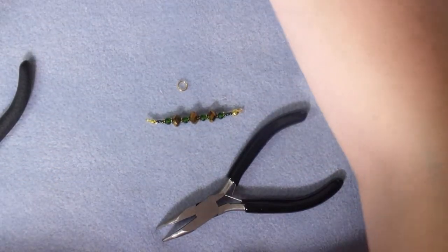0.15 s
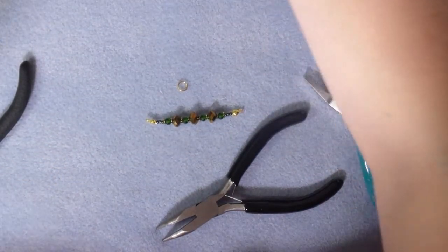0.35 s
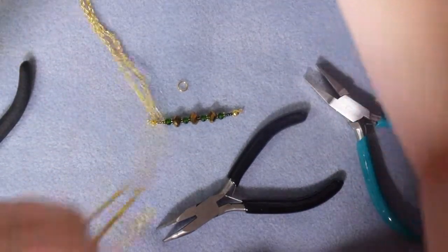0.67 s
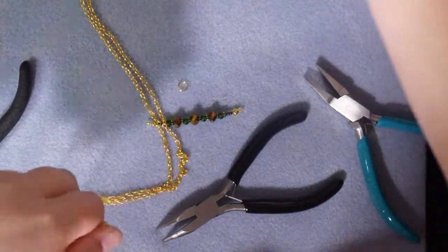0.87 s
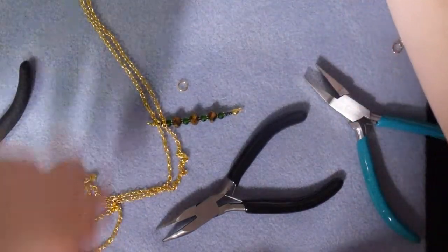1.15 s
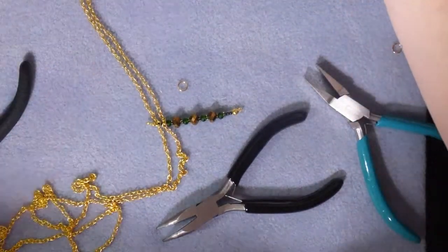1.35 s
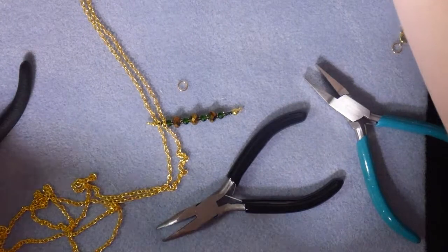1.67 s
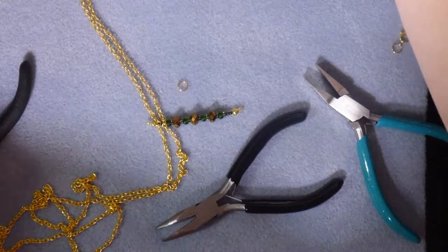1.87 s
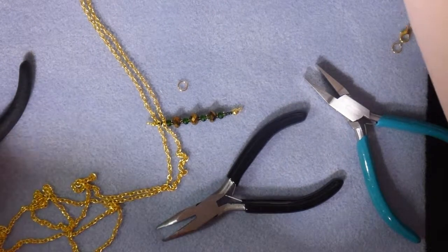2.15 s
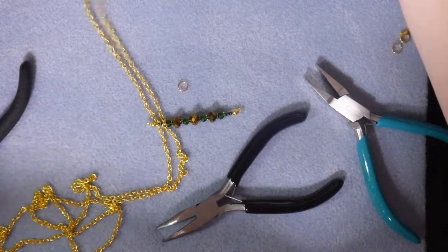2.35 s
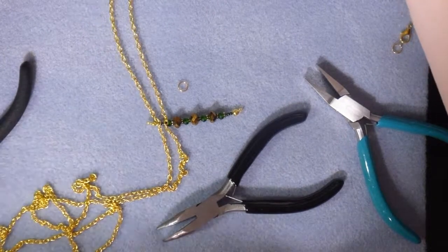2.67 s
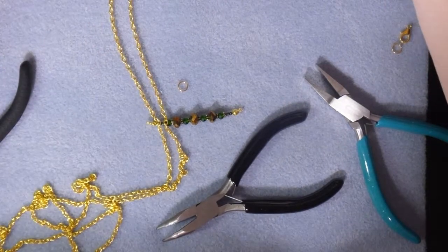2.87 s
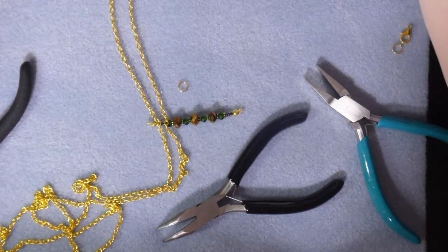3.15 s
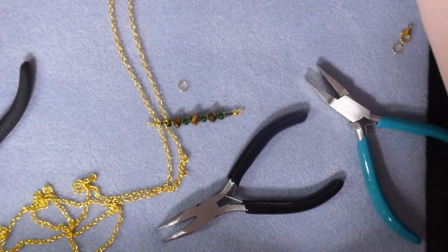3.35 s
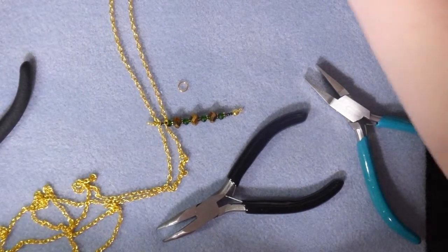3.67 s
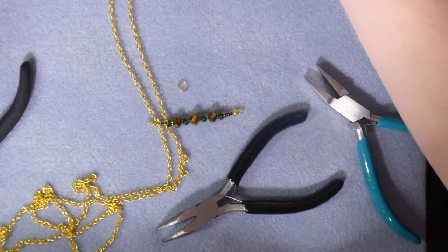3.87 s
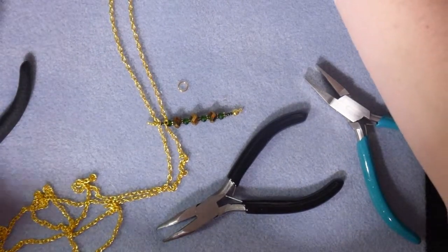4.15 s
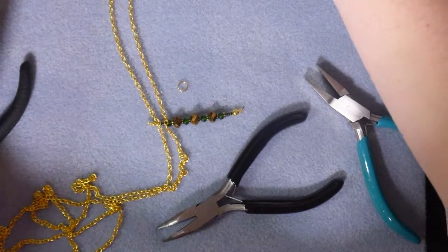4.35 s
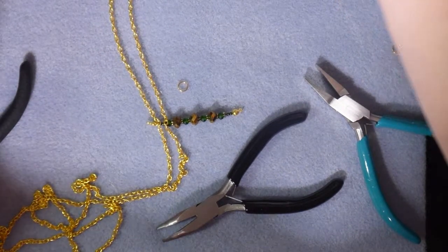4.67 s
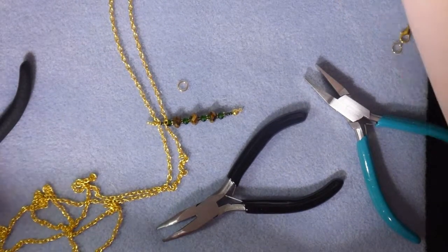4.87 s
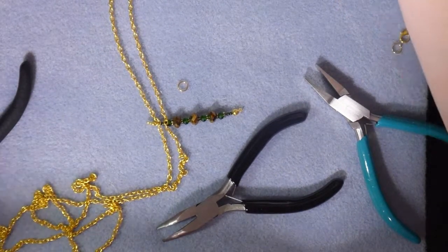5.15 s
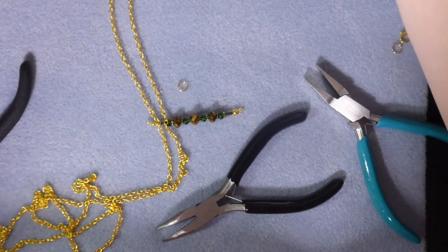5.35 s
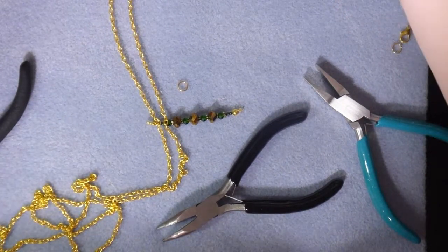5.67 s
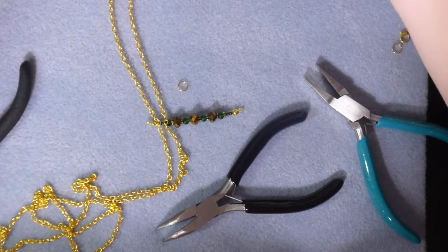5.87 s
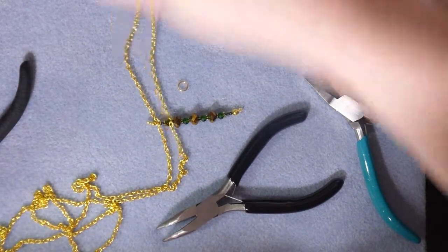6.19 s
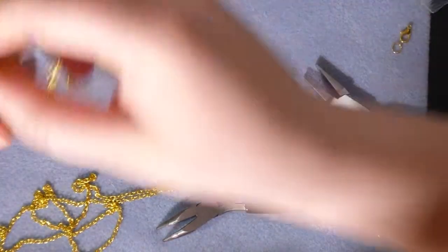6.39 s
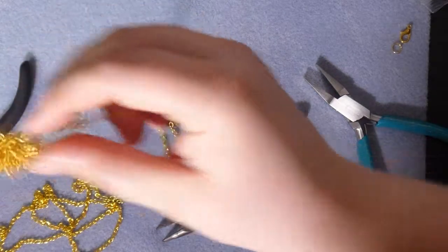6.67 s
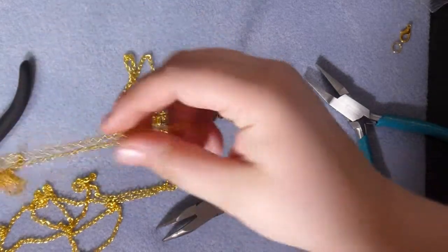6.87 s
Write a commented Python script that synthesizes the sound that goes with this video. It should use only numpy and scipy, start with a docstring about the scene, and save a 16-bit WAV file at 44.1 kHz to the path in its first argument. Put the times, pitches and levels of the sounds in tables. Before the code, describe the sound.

A quiet small room with steady soft hiss, heard close in stereo. From 0 to 0.6 s a hand drags over cloth in dull, jerky rubs and bumps, with light chain rustle. At 0.7 s a length of fine chain lands in a bright, high burst, then thins to ticks, with soft bumps around 1.0 and 1.7 s and a faint knock near 1.5. A clearer tap comes at 2.1 s, then gentle rustle and brief cloth hiss to 2.8. At 3.3 s a thump and crisp jingle; at 3.7 s the strongest table knock, another at 3.9. A hard object clacks sharply at 4.3 s, with a faint rasp and a hollow knock at 4.75. Chain clinks cluster at 4.9, 5.1 and 5.3 s, with the brightest, loudest at 5.55, then rustle. Hand bumps thud at 5.9 s; after 6.1 only faint links and hiss remain.

```python
"""A cloth-covered table in a small, quiet room: a fine metal chain is pulled out, dropped in a pile and picked up again.
Sparse random blows make the links tick and ring near 10 kHz: clumped in a rustle, in bursts when a length lands.
Filtered grains make the hiss of chain on cloth, the dull drag of hands and the rasp of a hard thing pushed along.
Soft pushes thud and ring the table top; noise cracks with a hollow knock and a ping put the hard thing down.
Short echoes surround it all, over steady stereo room noise and hiss."""
import sys
import numpy as np
from scipy import signal
from scipy.io import wavfile

SR = 44100
rng = np.random.default_rng(int(sys.argv[2]) if len(sys.argv) > 2 else 0)


def log_audio(samples):
    """Write samples as a 16-bit WAV file to the path given in sys.argv[1]."""
    # one column per channel
    frames = np.atleast_2d(samples).T
    # limit to full scale, then quantise
    limited = np.clip(frames, -1, 1)
    pcm = np.round(limited * 32767).astype(np.int16)
    wavfile.write(sys.argv[1], SR, pcm)


N = 309582

# Levels in the event tables are relative: each layer adds its own gain.
# A hand drags over the table top in jerks:
# (start [s], speeding up [s], steady [s], coming to rest [s], level [dB], dull above [Hz])
HAND_DRAGS = [(0, 0.0084, 0.015, 0.12, -31.5, 710), (0.033, 0.025, 0.06, 0.041, -30, 1450),
              (.135, 0.013, 0.022, 0.028, -32, 1080), (.18, 0.023, 0.08, 0.043, -38, 700),
              (0.221, 0.0043, 0.0066, 0.052, -38.5, 700), (0.273, 0.033, 0.023, 0.04, -30.5, 940),
              (.358, 0.0092, 0.033, 0.016, -33, 300), (0.408, 0.011, 0.014, 0.2, -42, 1240),
              (0.973, 0.038, 0.048, 0.021, -37, 700), (1.87, 0.062, 0.039, 0.046, -45, 1500),
              (1.98, 0.058, 0.027, 0.028, -43, 300), (5.863, 0.027, 0.005, 0.025, -24.5, 1510),
              (5.9, 0.046, 0.097, 0.056, -44, 1230)]
# The chain is moved: (start [s], speeding up [s], steady [s], coming to rest [s], level [dB])
CHAIN_PULLS = [(0, 0.00031, 0.011, 0.2, -34), (.12, .15, 0.076, 0.19, -41.5),
               (.42, 0.011, 0.052, 0.52, -44.5), (.68, 0.017, 0.028, 0.17, -35.5),
               (.8, 0.025, 0.01, 0.099, -39), (.88, 0.074, 0.11, 0.18, -50),
               (1.25, 0.15, 0.22, 0.053, -58.5), (1.85, 0.054, 0.052, 0.29, -48.5),
               (2.17, 0.093, 0.054, .1, -46.5), (2.29, 0.036, 0.071, 0.14, -38.5),
               (2.35, 0.1, 0.048, 0.23, -38), (2.605, .035, .025, .07, -42), (2.74, .09, .02, .12, -42),
               (3.285, .055, .025, .075, -30.5), (3.4, 0.032, 0.044, 0.059, -45.5),
               (3.52, 0.073, 0.27, 0.11, -63.5), (3.9, 0.023, 0.15, 0.065, -48.5),
               (4.37, 0.053, 0.018, 0.69, -49), (4.535, 0.0092, 0.24, 0.69, -44.5),
               (4.7, 0.1, 0.045, 0.52, -41.5), (4.93, 0.079, 0.17, 0.073, -48.5),
               (5.4, 0.16, 0.23, 0.22, -45), (5.6, 0.04, 0.23, 0.15, -32.5),
               (5.97, 0.064, 0.012, 0.049, -39.5), (6.25, 0.42, .12, 0.62, -54.5)]
STIR_DB = -65.5  # least motion, on the scale of the pulls: the links never lie quite still
# stray hard snaps within the rustle: level against it at the usual speed [dB], rate against its soft collisions
STRAY_DB, STRAY_SHARE = -8, .16
# Bumps on the table:
# (time [s], peak level [dB], contact time constant [ms], mode favoured at that spot [Hz], favoured by [dB])
TABLE_BUMPS = [(0.018, -41, 0.13, 350, 4), (0.306, -26, 0.15, 350, 4), (0.323, -28, 0.7, 350, 5),
               (0.391, -27, 0.6, 350, 7), (0.682, -35, 0.18, 350, 9), (1.019, -27, 0.29, 350, 7),
               (1.041, -28.5, 0.47, 350, 8), (1.689, -29.5, 0.46, 226, 8), (1.702, -30, 0.47, 226, 11),
               (1.72, -34, 3, 109, 8), (1.783, -32.5, 0.69, 350, 2), (1.972, -27, 0.55, 350, 6),
               (2.081, -18, 0.11, 938, 1.5), (2.205, -34.5, 0.17, 350, 14), (3.213, -42, 0.29, 350, -3),
               (3.3176, -18, 0.37, 503, 4), (3.7196, -8, 0.11, 938, 4.5), (3.863, -33, 0.82, 156, 9),
               (3.931, -19.5, 0.097, 817, 3.5), (4.174, -41, 0.26, 938, 5), (4.3, -30, 0.52, 350, 14),
               (4.316, -24, 0.031, 350, 8), (4.593, -34.5, 0.29, 350, 13), (5.88, -16.5, 0.085, 938, 4),
               (5.9393, -17, 0.22, 674, 8), (6.068, -30.5, 0.057, 674, 4), (6.787, -43.5, 0.05, 350, -3)]
# A length of chain lands or slips:
# (time [s], level [dB], time constant of the links settling [s], share of hard link-on-link snaps [0-1])
CHAIN_LANDINGS = [(0.2052, -26, 0.0096, 0.4), (0.418, -28.5, 0.0029, 0), (0.47, -40, 0.0028, 0.3),
                  (0.488, -35, 0.006, 0.5), (0.498, -33, 0.0046, 0.4), (0.543, -39.5, 0.0042, 0),
                  (0.64, -37.5, 0.0061, 0), (0.6801, -14.5, 0.017, 0.95), (0.697, -18.5, 0.0084, 0.35),
                  (0.811, -45, 0.0016, .9), (0.859, -37, 0.0011, 0.4), (1.04, -34.5, 0.004, 0),
                  (1.101, -39, 0.0058, 0.6), (1.113, -44, .004, 0.5), (1.187, -48, 0.0065, 0.4),
                  (1.545, -61, 0.003, .1), (2.053, -43.5, 0.0061, .1), (2.168, -41, 0.029, 0.9),
                  (2.629, -34, 0.008, 1), (2.649, -34, 0.0048, 0.86), (2.739, -45, 0.006, 0.4),
                  (2.754, -31.5, 0.0082, 0.17), (2.843, -52, 0.0025, 0.9), (3.129, -45, 0.0035, 0.9),
                  (3.27, -47, 0.06, 0.3), (3.332, -29.5, 0.016, 1), (3.348, -23, 0.008, 1),
                  (3.362, -24, 0.0018, 1), (3.368, -26.5, 0.0044, 0.9), (3.387, -31, 0.0065, 1),
                  (3.43, -33, 0.016, 0.9), (3.597, -47, 0.0072, 0.4), (3.794, -48.5, 0.0055, 0.1),
                  (3.908, -40.5, 0.0059, .3), (4.534, -34, 0.01, 0.4), (4.693, -30, 0.0043, .4),
                  (4.812, -34, 0.006, 0.3), (4.864, -25.5, 0.0053, 0.95), (4.875, -27.5, 0.011, 1),
                  (5.058, -38, 0.005, .5), (5.069, -33, 0.01, 0.3), (5.114, -30.5, 0.0035, 0.7),
                  (5.124, -29, 0.015, 1), (5.135, -28, 0.015, 0.37), (5.2931, -19.5, 0.0043, 0.98),
                  (5.301, -39, 0.019, 0.4), (5.463, -41, 0.0064, 0.1), (5.528, -41, 0.016, 0.2),
                  (5.555, -12, 0.0037, 1), (5.612, -18, 0.0049, .8), (5.678, -22.5, 0.024, 0.7),
                  (6.0, -32, 0.0046, 0.1), (6.026, -28, 0.004, 0)]
# The hard thing is put down and knocks:
# (time [s], crack level [dB], hollow body [dB], ping [dB], time constant of the crack [s])
HARD_KNOCKS = [(1.295, -43, -8, -14, 0.0011), (1.546, -35, 0, -16, 0.00067), (1.567, -38, -7, -17, .0012),
               (4.2989, -11, -15, -1, 0.0014), (4.3145, -15, -7.5, -17, 0.00078),
               (4.406, -30.5, 6, -3.5, 0.0014), (4.7472, -28, 5.5, 4, 0.0053)]
# Chain and hand slide over the cloth:
# (start [s], speeding up [s], steady [s], coming to rest [s], level [dB])
CLOTH_SLIDES = [(1.86, 0.043, .01, 0.35, -51.5), (2.1, 0.1, 0.37, 0.27, -50),
                (2.28, 0.23, 0.042, 0.045, -41.5), (2.62, 0.096, 0.079, 0.18, -54.5),
                (3.9, 0.15, 0.028, 0.081, -54.5), (6.5, 0.61, .02, 0.18, -68.5)]
# A hard thing is pushed along the table:
# (start [s], speeding up [s], steady [s], coming to rest [s], level [dB])
HARD_SCRAPES = [(4.12, 0.35, 0.3, 0.58, -48)]

# Modes of the table top: (frequency [Hz], level [dB], decay by 60 dB [s])
TABLE_MODES = [(109, -21, .12), (156, -18, .12), (226, -10, .16), (289, -8, .11), (351, -7, .11),
               (503, -1.5, .065), (674, -1, .065), (817, -2.5, .055), (938, 1.5, .05), (1215, -13, .055),
               (1380, -16.5, .05)]
# Modes of the hard thing: (frequency [Hz], level [dB], decay by 60 dB [s])
HARD_THING_MODES = [(3250, -33, 0.031), (3576, 1.5, 0.017), (3640, -7, 0.018), (4060, -4, 0.017),
                    (4340, -19, .025), (5030, -13, 0.013), (6100, -9, 0.013)]
# Rings of the links: (frequency [Hz], level [dB])
LINK_MODES = [(3500, -9), (4150, -7), (4450, -8), (6100, -7), (7000, -6), (9485, -2), (9700, -2), (9905, 0),
              (10030, 0), (10185, 1), (10300, -1), (10627, 0), (10977, 1), (11305, 1), (11650, 0),
              (11900, 1), (12190, -4), (12650, -7)]

# Spectrum of the steady room noise and hiss: (frequency [Hz], relative level [dB])
AIR_SPECTRUM = [(25, -14), (60, -17), (130, -3.5), (220, -1), (350, 1), (480, -3.5), (700, -2.5),
                (1000, -7), (2200, -13), (3500, -12.5), (8000, -15), (10500, -12), (12000, -20),
                (14000, -30), (15500, -45)]
AIR_DB = -60.5
# Spectrum of skin dragging on cloth: (frequency [Hz], relative level [dB])
DRAG_SPECTRUM = [(60, -36), (135, -12), (210, -12), (280, -3), (350, 4.5), (400, -1), (465, -13), (560, -2),
                 (680, -2), (800, -10), (940, -2), (1200, -16), (1500, -19), (2200, -26), (4000, -32)]
# Spectrum of links cushioned by the cloth: (frequency [Hz], relative level [dB])
SOFT_LINK_SPECTRUM = [(150, -27.5), (350, -14), (1000, -14), (1800, -17), (2600, -20.5), (3200, -15.5),
                      (4100, -8.5), (5200, -11), (6500, -8.5), (8200, -9.5), (9700, 0), (11700, -0.5),
                      (13000, -9.5), (14000, -18), (15000, -28), (16000, -47)]
# Spectrum of hard link-on-link snaps: (frequency [Hz], relative level [dB])
HARD_LINK_SPECTRUM = [(300, -27), (2500, -25), (4200, -13), (5200, -13), (6500, -9), (8200, -9), (9700, -1),
                      (11700, 1), (13000, -4), (14000, -10), (15000, -19), (16000, -31)]
# Spectrum of the table's thud: (frequency [Hz], relative level [dB])
THUD_SPECTRUM = [(50, -31.5), (130, -24.5), (300, 3), (520, 4.5), (800, 0.5), (1020, -0.5), (1250, -14.5),
                 (1600, -25.5), (2100, -14.5), (3000, -16), (4500, -6), (8000, -44)]
# Spectrum of the hard thing's crack: (frequency [Hz], relative level [dB])
CRACK_SPECTRUM = [(300, -3.5), (1200, 5), (2000, -25), (2800, -39), (3400, -9), (5000, -4), (6800, -17.5),
                  (11000, -15), (12500, -29), (15000, -78)]
# Spectrum of the hard thing's hollow body: (frequency [Hz], relative level [dB])
HOLLOW_SPECTRUM = [(250, -11), (700, -2), (950, -8), (1220, 5), (1450, -2.5), (1620, 7), (1850, -2),
                   (2090, 5), (2350, -6.5), (2800, -2), (6000, -81)]
# Spectrum of sliding over the cloth: (frequency [Hz], relative level [dB])
SLIDE_SPECTRUM = [(90, -8), (220, -8.5), (330, 11.5), (480, 2), (850, 7.5), (1220, 1), (1900, -6.5),
                  (2600, -17), (3100, -12), (3500, -5.5), (4000, -12), (5000, -10.5), (8000, -18),
                  (14000, -36)]
# Spectrum of the dry rasp: (frequency [Hz], relative level [dB])
SCRAPE_SPECTRUM = [(80, -11.5), (160, -5.5), (250, -19), (330, 2), (500, -8.5), (900, -6), (1220, -1),
                   (1420, -6), (1650, -7), (2100, -9.5), (3100, -14.5), (3500, -12.5), (4500, -15.5),
                   (10000, -34)]

# The room's decay: (frequency [Hz], decay by 60 dB [s])
ROOM_DECAY = [(150, .2), (400, .16), (1000, .12), (3000, .11), (12000, .03)]
# Echoes of the table in the middle: (frequency [Hz], level against direct sound [dB])
TABLE_ECHO_MID = [(200, -6.5), (1000, -6), (10000, 6.5)]
# Echoes of the table to the sides: (frequency [Hz], level against direct sound [dB])
TABLE_ECHO_SIDE = [(100, -20), (300, -45), (600, -20), (1200, -8), (3000, -7), (8000, -2)]
# Echoes of the chain in the middle: (frequency [Hz], level against direct sound [dB])
CHAIN_ECHO_MID = [(1000, 4), (10000, -2)]
# Echoes of the chain to the sides: (frequency [Hz], level against direct sound [dB])
CHAIN_ECHO_SIDE = [(300, -5), (1200, 2.5), (3000, -4.5), (8000, -6.5), (12000, -4.5)]
EDGE_HZ = 15900


def amp(db):
    """Decibels to gain."""
    return 10 ** (np.asarray(db) / 20)


def unit(x):
    """Scales to rms 1."""
    return x / np.sqrt(np.mean(x ** 2) + 1e-20)


def read(points, hz):
    """Reads a curve on a log-frequency axis."""
    f, value = np.transpose(points)
    return np.interp(np.log(hz + 1), np.log(f + 1), value)


def add(mix, s, sound):
    """Mixes a sound in at time s."""
    part = mix[max(round(s * SR), 0):][:len(sound)]
    part += sound[:len(part)]


def colour(x, points):
    """Minimum-phase filter of unit energy with the shape of the given spectrum."""
    log_gain = np.log(amp(read(points, abs(np.fft.fftfreq(4096, 1 / SR)))))
    response = np.exp(np.conj(signal.hilbert(log_gain)))
    taps = np.fft.ifft(response).real[:2048]
    return signal.oaconvolve(x, taps / np.linalg.norm(taps))[:len(x)]


def ticks(per_s, spread_db, count):
    """Random tiny impacts, mostly small, a few large; mean power about 1."""
    chance, size, sign = rng.random((3, count))
    sizes = amp(spread_db * np.minimum(-np.log(1 - size), 4))
    blows = unit(sizes) * np.sign(sign - .5)
    share = np.clip(per_s / SR, 1e-4, 1)
    return blows * (chance < share) / np.sqrt(share)


def flutter(depth_db, per_s):
    """A gain of rms 1 that wanders at random, through two random points per cycle."""
    steps = rng.standard_normal(size=4000)
    position = 2 * per_s * np.arange(N) / SR
    return unit(amp(depth_db * np.interp(position, np.arange(len(steps)), steps)))


def clumps(clump_s):
    """Numbers the successive moments of equal length, sample by sample."""
    return np.minimum(np.arange(N) / SR / clump_s, 999).astype(int)


def strokes(rows, rest_db=-20):
    """Gain of movements: each speeds up smoothly, holds, then falls by rest_db per coming-to-rest time."""
    power = np.zeros(N)
    for start, rise_s, hold_s, fall_s, db in rows:
        t = np.arange(N) / SR - start
        rise = np.sin(np.pi / 2 * np.clip(t / rise_s, 0, 1)) ** 2
        fall_db = rest_db * np.maximum(t - rise_s - hold_s, 0) / fall_s
        power += (rise * amp(db + fall_db)) ** 2
    return np.sqrt(power)


def air(gain_db=0, side_db=-6):
    """Steady room noise and microphone hiss, partly different on the two sides."""
    mid, side = (colour(noise, AIR_SPECTRUM) for noise in rng.standard_normal((2, N)))
    side = amp(side_db) * side
    return amp(AIR_DB + gain_db) * np.array([mid + side, mid - side])


def drags(gain_db=-1.5):
    """Skin sticks and slips on the cloth and shakes the table top; soft flesh sounds duller."""
    slips = colour(ticks(per_s=1200, spread_db=1.5, count=N), DRAG_SPECTRUM)
    out = np.zeros(N)
    for *stroke, top_hz in HAND_DRAGS:
        dulled = signal.lfilter(*signal.butter(1, top_hz, fs=SR), slips)
        out += strokes([stroke]) * unit(dulled)
    return amp(gain_db) * out


def rustle(gain_db=-1.45, usual_db=-42, usual_per_s=2500, spread_db=2.0):
    """Links collide more often and harder the faster the chain moves; gives soft and hard blows."""
    motion = np.hypot(strokes(CHAIN_PULLS), amp(STIR_DB))
    speed_up = np.sqrt(motion / amp(usual_db))
    per_s = usual_per_s * speed_up
    soft = flutter(depth_db=1.26, per_s=57) * ticks(per_s, spread_db, count=N)
    hard = amp(STRAY_DB) * speed_up * ticks(STRAY_SHARE * per_s, spread_db, count=N)
    return amp(gain_db) * motion * np.array([soft, hard])


def links(soft, hard, ring_db=-7, hard_ring_db=-5, ring_t60=0.1, clump_s=0.046, detune_hz=15, count=4):
    """Blows tick, brighter uncushioned by cloth, and ring one of a few modes that change by the moment."""
    in_play = rng.integers(0, len(LINK_MODES), size=(1000, count))
    which = in_play[clumps(clump_s), rng.integers(0, count, N)]
    r = amp(-60 / (ring_t60 * SR))  # decay per sample
    out = colour(soft, SOFT_LINK_SPECTRUM) + colour(hard, HARD_LINK_SPECTRUM)
    blows = soft + amp(hard_ring_db) * hard
    for k, (hz, db) in enumerate(LINK_MODES):
        turn = 2 * np.pi * (hz + detune_hz * rng.standard_normal()) / SR
        gain = amp(ring_db + db) * np.sqrt(1 - r * r) * np.sin(turn)
        struck = blows * (which == k) + 1e-18  # the offset avoids denormals
        out += signal.lfilter([gain], [1, -2 * r * np.cos(turn), r * r], struck)
    return out


def chain(count=6, clump_s=0.03):
    """Links collide at two neighbouring places at a time, each with its own echoes; gives mid and side."""
    first_place = rng.integers(0, count, size=1000)[clumps(clump_s)]
    place = (first_place + rng.integers(0, 2, N)) % count
    soft, hard = rustle() + clinks()
    out = np.zeros((2, N))
    for k in range(count):
        x = links(soft * (place == k), hard * (place == k))
        echo = signal.oaconvolve(x, reflections(CHAIN_ECHO_MID))[:N]
        side = signal.oaconvolve(x, reflections(CHAIN_ECHO_SIDE))[:N]
        out += [x + echo, side]
    return out


def bumps(gain_db=-1, ring_db=1, scatter_db=-19, scatter_s=0.01):
    """A push on the table gives a thud and rings its modes, one favoured; longer contact sounds duller."""
    out, t = np.zeros(N), np.arange(SR // 4) / SR
    for s, db, contact_ms, main_hz, favour_db in TABLE_BUMPS:
        main = np.argmin([abs(mode[0] - main_hz) for mode in TABLE_MODES])
        ring = np.zeros(len(t))
        for k, (hz, mode_db, t60) in enumerate(TABLE_MODES):
            fade = amp(mode_db + favour_db * (k == main) - 60 * t / t60)
            ring += (-1) ** k * fade * np.cos(2 * np.pi * hz * t)
        # the bending wave returns from the table's edges, differently for each bump
        returns = amp(scatter_db) * np.exp(-t / scatter_s) * rng.standard_normal(len(t))
        thud = colour(signal.unit_impulse(len(t)) + returns, THUD_SPECTRUM)
        body = unit(thud) + amp(ring_db) * unit(ring)
        push = t * t * np.exp(-1000 * t / max(contact_ms, .03))
        knock = signal.fftconvolve(push, body)[:len(t)]
        add(out, s, amp(db + gain_db) * knock / abs(knock).max())
    return out


def clinks(gain_db=-2.5, rise_s=0.00042):
    """A length of chain lands: soft and hard collisions in a burst that dies away as the links settle."""
    out, t = np.zeros((2, N)), np.arange(SR // 8) / SR
    for s, db, settle_s, hardness in CHAIN_LANDINGS:
        burst = (1 - np.exp(-t / rise_s)) * np.exp(-t / max(settle_s, rise_s))
        burst = burst / burst.max()
        for blows, share in zip(out, np.clip([1 - hardness, hardness], 0, 1)):
            grain = ticks(per_s=11000, spread_db=0.0, count=len(t))
            add(blows, s, amp(db + gain_db) * np.sqrt(share) * burst * grain)
    return out


def clacks(gain_db=-12.5, rattle_db=-13, rattle_s=0.024, ring_db=-7, hollow_db=3):
    """A hard contact: a short crack and brief rattle, the ping of its modes and a hollow body's knock."""
    cracks, knocks, pings = np.zeros((3, N))
    t = np.arange(SR // 8) / SR
    ring = sum(amp(db - 60 * t / t60) * np.sin(2 * np.pi * hz * t) for hz, db, t60 in HARD_THING_MODES)
    for s, db, body_db, ping_db, crack_s in HARD_KNOCKS:
        fade = np.exp(-t / crack_s) + amp(rattle_db) * np.exp(-t / rattle_s)
        crack = amp(db + gain_db) * fade * rng.standard_normal(len(t))
        add(cracks, s, crack)
        add(knocks, s, amp(body_db + hollow_db) * crack)
        add(pings, s, amp(db + ping_db + ring_db) * ring)
    return colour(cracks, CRACK_SPECTRUM) + pings + colour(knocks, HOLLOW_SPECTRUM)


def slides(gain_db=2):
    """Cloth fibres catch and let go under the sliding chain: dense, fluttering grains."""
    grain = ticks(per_s=12000, spread_db=4.5, count=N) * flutter(depth_db=3.0, per_s=25.0)
    return amp(gain_db) * strokes(CLOTH_SLIDES) * colour(grain, SLIDE_SPECTRUM)


def scrapes(gain_db=2):
    """The hard thing is pushed along the table: fluttering grains make a dry, hollow rasp."""
    grain = ticks(per_s=5000, spread_db=1.5, count=N) * flutter(depth_db=2.0, per_s=15)
    return amp(gain_db) * strokes(HARD_SCRAPES) * colour(grain, SCRAPE_SPECTRUM)


def reflections(points, near_db=9, near_s=0.012, first_s=0.0006):
    """Quick echoes off the table and the things on it, then the short tail of the room."""
    t = np.arange(SR // 2) / SR
    density = (1 + amp(near_db) * np.exp(-t / near_s)) * (t > first_s)
    noise = rng.standard_normal(len(t)) * density
    hz, at, z = signal.stft(noise, SR, nperseg=256)
    z = z * amp(-60 * at / read(ROOM_DECAY, hz)[:, None])
    energy = np.linalg.norm(signal.istft(z, SR)[1])
    return signal.istft(z * amp(read(points, hz))[:, None], SR)[1] / energy


def room(x, points, turns_per_s=1.311, count=3):
    """A steady cycle blends echo patterns, standing in for hands and chain that move about."""
    turn = 2 * np.pi * turns_per_s * np.arange(N) / SR
    out = np.zeros(N)
    for k in range(count):
        share = np.cos(turn + np.pi * k / count) * np.sqrt(2 / count)
        out += signal.oaconvolve(x * share, reflections(points))[:N]
    return out


def scene(balance_db=-0.91, low_cut_hz=112):
    """All sources lie on the table; their reflections differ between the two microphones."""
    table = drags() + bumps() + clacks() + slides() + scrapes()
    table_mid = table + room(table, TABLE_ECHO_MID)
    both = chain() + [table_mid, room(table, TABLE_ECHO_SIDE)]
    low_cut = signal.butter(4, low_cut_hz, "high", fs=SR, output="sos")
    mid, side = signal.sosfilt(low_cut, both)
    return np.array([(mid + side) * amp(balance_db), mid - side]) + air()


def record(dry):
    """A steep low-pass at EDGE_HZ: nothing sounds above it."""
    taps = signal.firwin(511, EDGE_HZ, window=("kaiser", 9), fs=SR)
    return signal.oaconvolve(dry, taps[None], "same")


dry = scene()
out = record(dry)
log_audio(out)
```